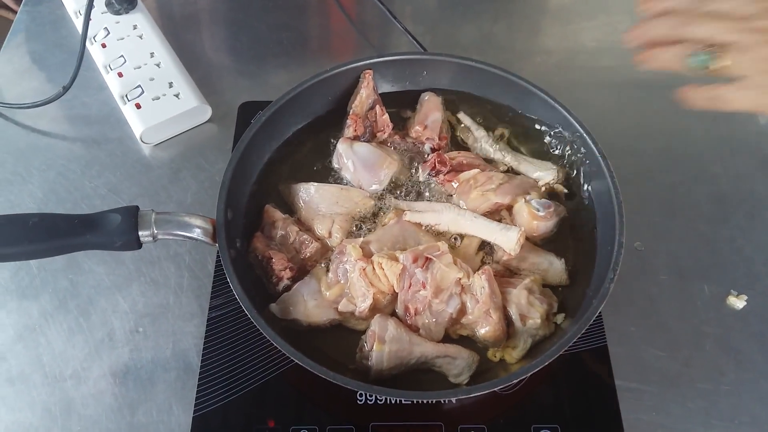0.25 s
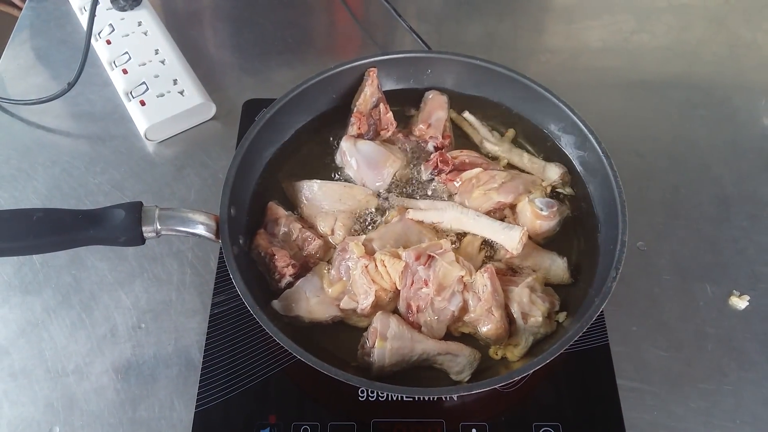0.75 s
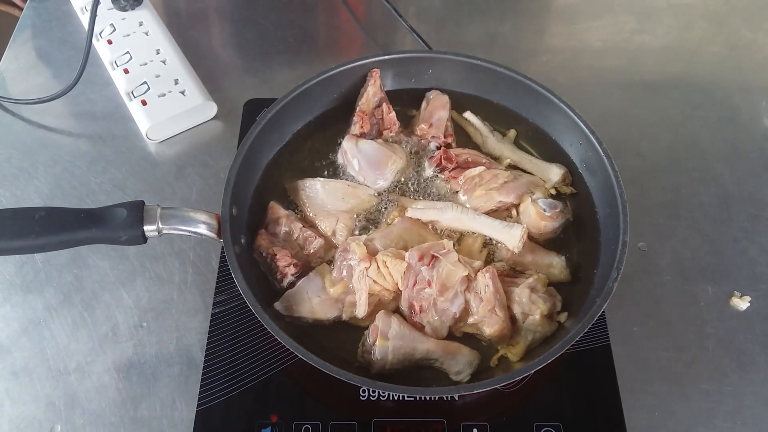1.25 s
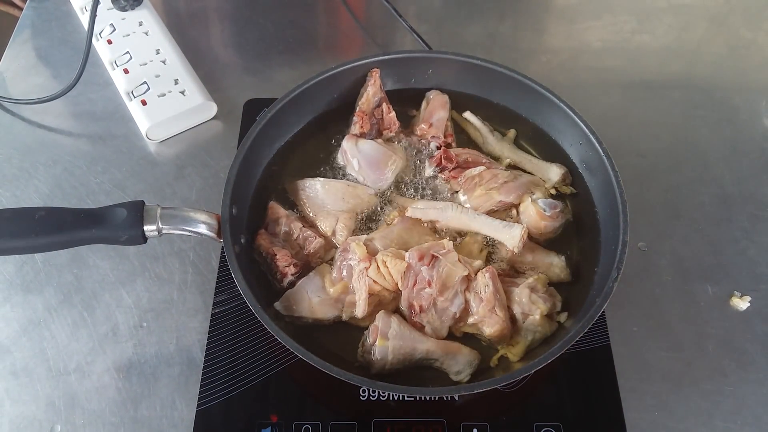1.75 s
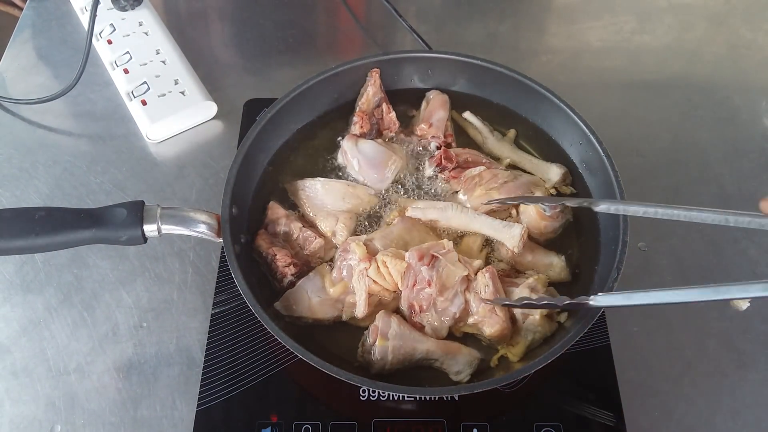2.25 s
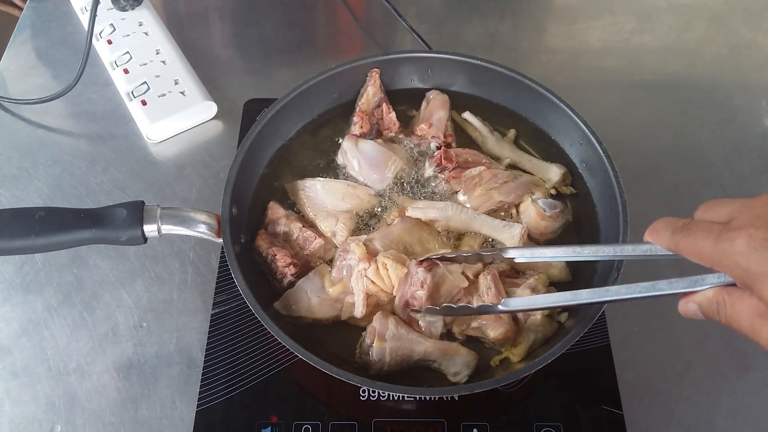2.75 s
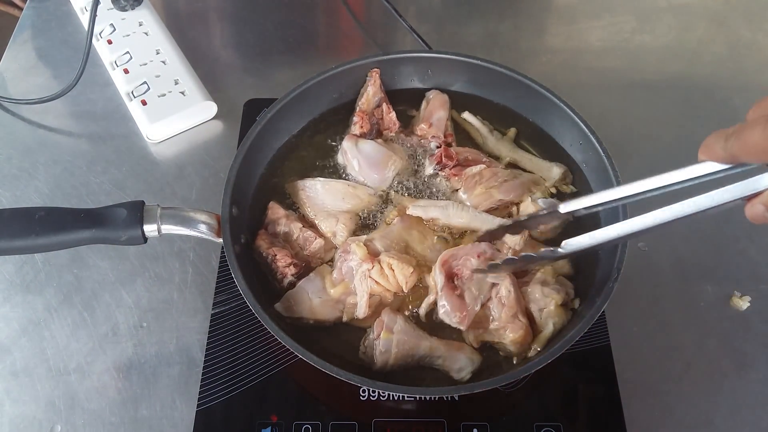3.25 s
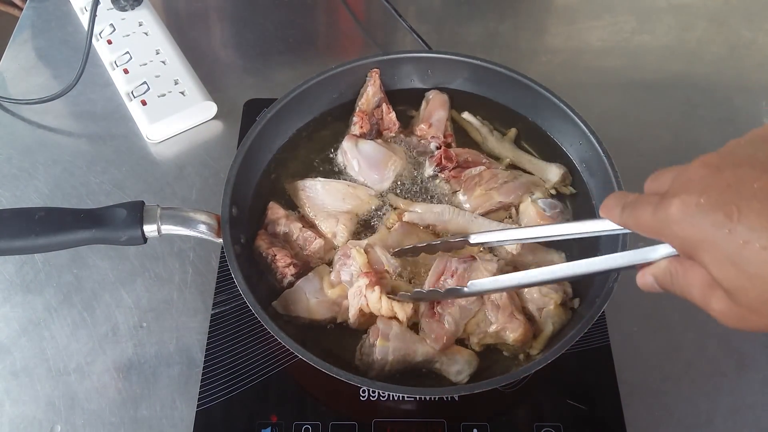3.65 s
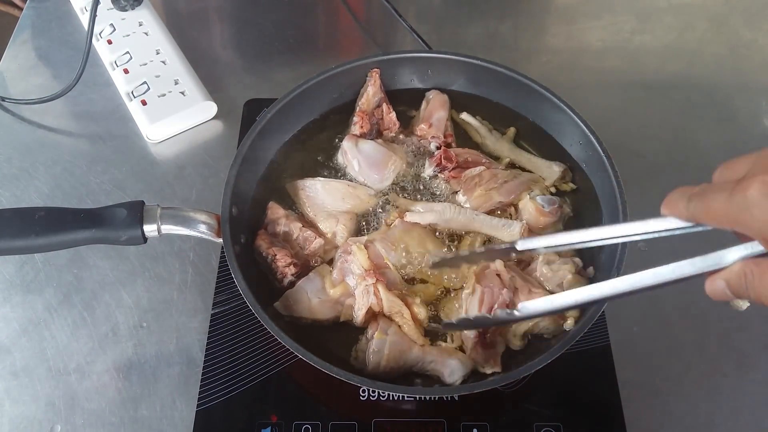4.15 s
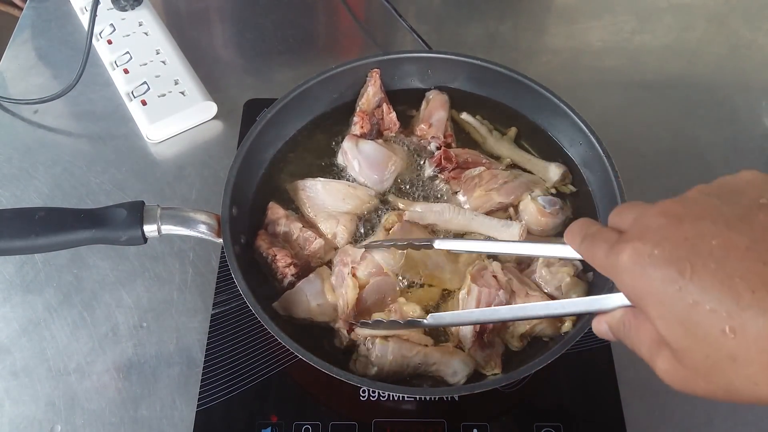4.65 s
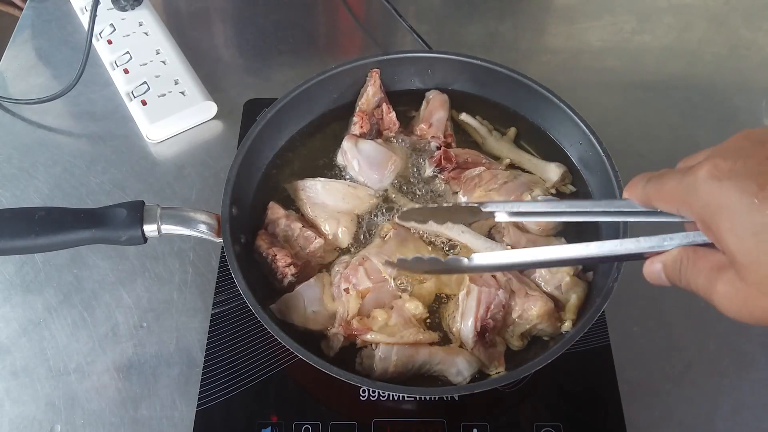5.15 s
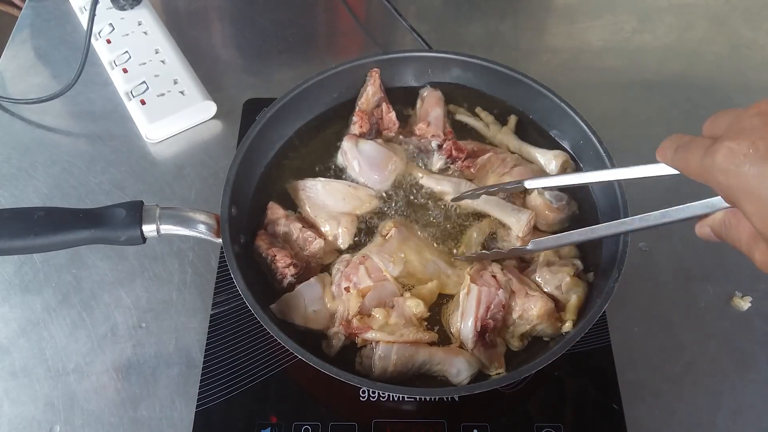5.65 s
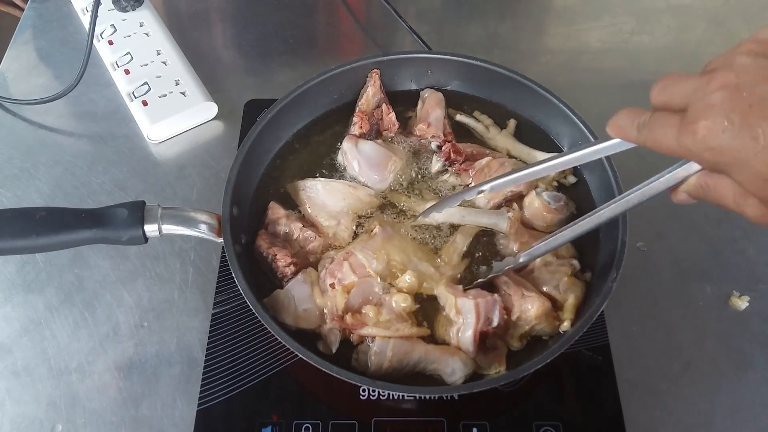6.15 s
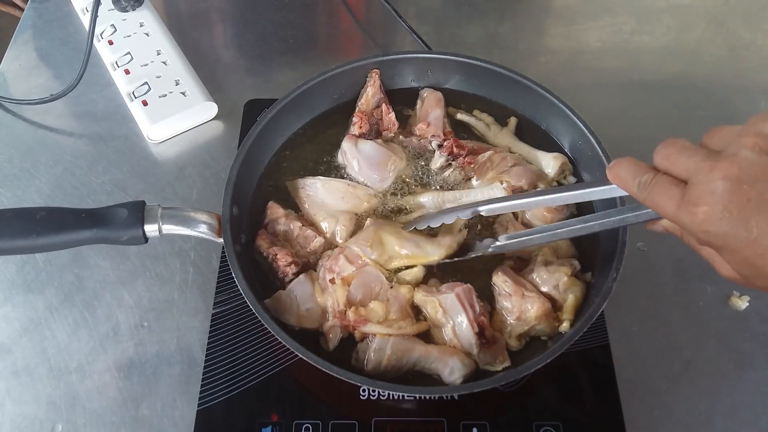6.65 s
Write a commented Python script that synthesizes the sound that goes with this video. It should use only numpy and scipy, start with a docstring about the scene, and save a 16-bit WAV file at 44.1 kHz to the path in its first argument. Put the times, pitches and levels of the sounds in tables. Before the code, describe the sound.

Close to the microphone, raw chicken fries in a pan of oil: fizzing, crackling, gurgling, with sharp pops. Soft dull bumps come first, then the frying eases. Five hard metal clacks from tongs strike one by one, farther off and slightly right, echoing in a bare kitchen. The sizzle revives as pieces are turned, sinks, then flares near the end. Thin steel scrapes and rings after the last two clacks. Low rumble beneath.

```python
"""Chicken sizzles in a pan of hot oil, close by: fizz, crackle and gurgle from random clicks over hiss,
pops from short decaying sines; one frying level drives it, livelier as tongs turn the pieces.
Soft bumps (filtered noise) come at the start and once late, over a low noise rumble.
Five hard clacks, decaying noise with a short ring, sound from farther off and fill the bare kitchen;
twice thin steel rings on after them, as fluttering modes with a rasp."""
import sys
import numpy as np
from scipy.fft import rfft, irfft, next_fast_len
from scipy.io import wavfile
from scipy.ndimage import uniform_filter1d, minimum_filter1d, map_coordinates

SR = 44100
rng = np.random.default_rng(int(sys.argv[2]) if len(sys.argv) > 2 else 0)


def master_out(mix):
    """Clip the mix to full scale and print it as 16-bit PCM to the path in sys.argv[1]."""
    frames = np.transpose(np.atleast_2d(mix))
    ceiling = np.clip(frames, -1, 1)
    pcm = np.round(ceiling * 32767).astype(np.int16)
    wavfile.write(sys.argv[1], SR, pcm)


N = 304290


def amp(db):
    """Decibels to gain."""
    return 10 ** (np.asarray(db) / 20)


def unit(x):
    """Scale to rms 1."""
    return x / np.sqrt(np.mean(x ** 2) + 1e-20)


def seconds(length_s):
    """Sample times of a sound, from 0."""
    return np.arange(int(length_s * SR)) / SR


def noise(n):
    """Two unrelated channels of white noise."""
    return rng.standard_normal((2, n))


def along(points, hz):
    """(f/Hz, value) points read on a log frequency axis."""
    f, value = np.transpose(points)
    return np.interp(np.log(hz + 1), np.log(f + 1), value)


def wobble(knots_per_s):
    """A smooth random curve through normally distributed knots."""
    knots = rng.standard_normal(int(N * knots_per_s / SR) + 4)
    return map_coordinates(knots, [np.arange(N) * knots_per_s / SR])


def filtered(x, response):
    """Multiply the spectrum of x by a response of frequency."""
    n = x.shape[-1]
    padded = next_fast_len(n + 8192)
    hz = np.fft.rfftfreq(padded, 1 / SR)
    return irfft(rfft(x, padded) * response(hz), padded)[..., :n]


def lifts(modes, hz):
    """Summed lift in dB of resonances; width is full width at half the dB lift."""
    return sum(db / (1 + (2 * (hz - centre) / width) ** 2) for centre, width, db in modes)


# stereo likeness of close sound: f/Hz, left-right correlation
NEAR_LIKENESS = [(100, 0.99), (350, 0.99), (800, 0.85), (1500, 0.56), (1850, 0.44), (2600, 0.51),
                 (3700, 0.21), (4600, 0.22), (6500, 0.024)]
# stereo likeness of room-scattered sound: f/Hz, left-right correlation
FAR_LIKENESS = [(250, 1), (400, 0.98), (600, 0.24), (1000, 0.16), (1500, 0.42), (2400, 0.13), (3500, 0.15),
                (6000, .05)]


def spread(pair, colour_db, likeness):
    """Two unrelated signals, coloured and mixed as mid and side to a set correlation, overall rms 1."""
    def mid_side(hz):
        angle = np.arccos(np.clip(along(likeness, hz), -1, 1)) / 2
        return amp(colour_db(hz)) * np.array([np.cos(angle), np.sin(angle)])

    mid, side = filtered(pair, mid_side)
    return unit(np.array([mid + side, mid - side]))


def add(track, s, sound):
    """Mix a sound into a track at time s."""
    i = max(round(s * SR), 0)
    track[:, i:i + sound.shape[-1]] += sound[..., :N - i]


def bursts(rate_per_s, size_db, hiss_rms):
    """Tiny bubbles burst at random, most weak and a few strong (rms 1), over a smooth hiss."""
    hit = rng.random((2, N)) < rate_per_s / SR
    size = np.minimum(rng.exponential(size=(2, N)), 4)
    sign = rng.choice([-1, 1], (2, N))
    return unit(hit * sign * amp(size_db * size)) + hiss_rms * noise(N)


# how hard the oil fries: t/s, level/dB
FRYING = [(0, -41.5), (.45, -40), (.95, -41), (.98, -46.5), (1.25, -49), (1.9, -47), (2.3, -41.5),
          (2.85, -41.5), (4.02, -41), (4.55, -48.5), (4.86, -48.5), (5.4, -54), (6.08, -54.5), (6.3, -43.5),
          (6.55, -45.5), (6.9, -49)]


def frying_level():
    """Frying level in dB per sample; it drives the sizzle, the stray pops and the rumble."""
    s, db = np.transpose(FRYING)
    return np.interp(np.arange(N) / SR, s, db)


# rumble spectrum: f/Hz, relative level/dB per Hz
RUMBLE_COLOUR = [(25, -35), (45, -16), (65, 0.5), (85, 9), (130, -2), (200, -3.5), (400, -26), (900, -60)]
# rumble stereo: f/Hz, left-right correlation
RUMBLE_LIKENESS = [(40, 0.4), (80, 1), (150, 0.93)]


def rumble(frying_db, boil_db=-14, floor_db=-62.5):
    """Low noise: the boil's share follows the frying level, the kitchen's share is steady."""
    level = np.hypot(amp(frying_db + boil_db), amp(floor_db))
    sound = spread(noise(N), lambda hz: along(RUMBLE_COLOUR, hz), RUMBLE_LIKENESS)
    return level * sound * amp([[-2], [1]])


# soft bumps on the counter: t/s, level/dB
BUMPS = [(0.019, -30.5), (0.13, -25.5), (0.281, -38), (0.364, -32), (0.444, -32), (0.509, -30.5),
         (6.32, -39.5)]


def bumps(centre_hz=95, t60_s=0.13, rise_s=0.0032, lead_s=0.005):
    """Dull thumps: bass noise with a fast rise and exponential decay, stronger on the right."""
    out, t = np.zeros((2, N)), seconds(0.2)
    colour_db = lambda hz: -14 * np.log2((hz + 1) / centre_hz) ** 2
    for s, db in BUMPS:
        thump = spread(noise(len(t)), colour_db, [(100, 0.43)])
        envelope = amp(db - 60 * t / t60_s) * (1 - np.exp(-t / rise_s))
        add(out, s - lead_s, envelope * thump)
    return out * amp([[-6], [3]])


# thin steel, first way of ringing: f/Hz, level/dB
SHORT_RING = [(2977, -50), (3698, -53), (4070, -61), (5028, -46), (5787, -58), (6100, -56.5), (6325, -53),
              (7122, -57), (7311, -62), (8070, -64), (8200, -62), (9125, -74), (9975, -72), (11140, -79),
              (14010, -85)]
# thin steel, second way of ringing: f/Hz, level/dB
LONG_RING = [(1020, -49), (2610, -43), (2868, -49), (3747, -56), (5135, -45), (5170, -42.5), (6627, -53),
             (7030, -50), (7170, -52), (8446, -63), (9109, -69), (10767, -69), (10870, -76), (12904, -72)]
# steel scraped and set ringing; level applies to rasp and modes:
# t/s, level/dB, t60/s, rasp level/dB, rasp f/Hz, rasp width/octaves (to -6 dB), modes
SCRAPES = [(5.135, 8.5, 0.55, -44, 5600, 0.36, SHORT_RING), (6.66, 8, 1, -39.5, 1500, 0.83, LONG_RING)]


def steel(rise_s=0.017, flutter_hz=20, flutter_rms=1.0):
    """A noise rasp, and modes of the steel that flutter in level and phase as they die."""
    out, t = np.zeros((2, N)), seconds(1)
    slow = lambda hz: 1 / (1 + (hz / flutter_hz) ** 2)
    for s, db, t60_s, rasp_db, rasp_hz, octaves, modes in SCRAPES:
        rasp_colour_db = lambda hz: -6 * (np.log2((hz + 1) / rasp_hz) / octaves) ** 2
        sound = amp(rasp_db) * spread(noise(len(t)), rasp_colour_db, FAR_LIKENESS)
        for hz, mode_db in modes:
            in_phase, quadrature = unit(filtered(rng.standard_normal((2, 2, len(t))), slow))
            phase = 2 * np.pi * (hz * t + rng.random((2, 1)))
            mode = (1 + flutter_rms * in_phase) * np.sin(phase)
            mode += flutter_rms * quadrature * np.cos(phase)
            sound += amp(mode_db) * unit(mode)
        add(out, s, amp(db - 60 * t / t60_s) * (1 - np.exp(-t / rise_s)) * sound)
    return out


# hard clacks: t/s, level/dB, low thud lift/dB, knock lift/dB, treble lift/dB, t60/s
CLACKS = [(1.462, -13, -0.5, -4, -5, 0.39), (2.339, -11.5, 1.5, -2.5, 0.5, 0.55),
          (4.041, -9, -8, 4, -2, 0.52), (4.881, -12.5, -11.5, 0, -1.5, 0.49),
          (6.468, -11.5, -4, 2.5, 1.5, 0.54)]
# spectrum shared by the clacks: f/Hz, relative level/dB per Hz
CLACK_COLOUR = [(40, -50), (80, -19), (125, -6.5), (180, -3.5), (300, -2), (600, -0.5), (1000, -2.5),
                (1600, -6), (2600, -7), (4300, -10), (6400, -11), (7500, -25), (10500, -44), (16000, -59)]
# resonances shared by the clacks: f/Hz, width/Hz, lift/dB
CLACK_MODES = [(176, 20, 4), (217, 20, 1.5), (356, 42, 2.5), (445, 69, -5), (520, 31, 2), (558, 30, 6),
               (710, 6, -4), (826, 9.3, 1), (894, 29, 8), (1070, 17, -1), (1080, 36, 2), (1493, 43, 3.5),
               (1740, 23, -1), (2023, 114, 5.5), (2147, 49, 6), (2410, 30, 2.5), (3300, 94, 3),
               (5900, 490, 4.5)]
# ring of the struck thing itself: f/Hz, relative level/dB, t60/s
CLACK_RING = [(2007, -7.5, 0.063), (2134, -7.5, 0.063), (3300, -31, 0.063)]


def clacks(rise_s=0.001, hold_s=0.027, low_hz=400, knock_hz=1100, high_hz=2500,
           bass_lag_s=0.071, left_delay_s=0.000363, clump_db=1.08, ring_db=5.5):
    """Blows from the right: a short hard ring, then dense echoes that hold briefly and decay in clumps."""
    out, t = np.zeros((2, N)), seconds(1)
    onset = 1 - np.exp(-t / rise_s)
    for s, db, thud_db, knock_db, treble_db, t60_s in CLACKS:
        colour_db = lambda hz: (along(CLACK_COLOUR, hz) + lifts(CLACK_MODES, hz)
                                + thud_db / (1 + (hz / low_hz) ** 2)
                                + lifts([(knock_hz, 800, knock_db)], hz)
                                + treble_db * hz ** 2 / (hz ** 2 + high_hz ** 2))
        echoes = spread(noise(len(t)), colour_db, FAR_LIKENESS)
        # the room's low modes build up slowly
        bass = filtered(echoes, lambda hz: 1 / (1 + (hz / 230) ** 4))
        body = (echoes - bass) * onset + bass * (1 - np.exp(-t / bass_lag_s))
        decay = amp(-60 * np.maximum(t - hold_s, 0) / t60_s)
        ring = np.zeros((2, len(t)))
        for hz, mode_db, ring_t60_s in CLACK_RING:
            phase = rng.normal(0, 1, (2, 1))
            ring += amp(mode_db + ring_db - 60 * t / ring_t60_s) * np.sin(2 * np.pi * hz * t + phase)
        add(out, s, amp(db) * (decay * body + onset * ring))
    out *= amp(clump_db * wobble(110))
    shift_s = left_delay_s * np.array([[-.5], [.5]])  # left late, right early
    return filtered(out, lambda hz: np.exp(2j * np.pi * hz * shift_s)) * amp([[-.6], [.6]])


# spitting spectrum: f/Hz, relative level/dB per Hz
SPIT_COLOUR = [(1500, -18), (2600, -19), (3500, 0.5), (5200, -10), (6400, 8), (7300, -10), (9000, -22),
               (14000, -34), (16000, -36)]
# wet meat meets the oil: t/s, level/dB, length/s
SPITS = [(0.0, -49.5, 0.79), (0.26, -44, 0.25), (2.087, -51.5, 0.21), (3.277, -43.5, 0.185)]


def spitting(attack_s=0.016, release_t60_s=0.087):
    """Water flashes to steam in sparse sharp ticks: each fit swells, holds and dies away fast."""
    clicks = bursts(rate_per_s=1100, size_db=4.5, hiss_rms=0.43)
    ticks = spread(clicks, lambda hz: along(SPIT_COLOUR, hz), NEAR_LIKENESS)
    t, level = np.arange(N) / SR, np.zeros(N)
    for s, db, length_s in SPITS:
        swell = 1 - np.exp(-np.maximum(t - s, 0) / attack_s)
        level += swell * amp(db - 60 * np.maximum(t - s - length_s, 0) / release_t60_s)
    return level * ticks


def stray_pops(frying_db, count=30, over_frying_db=14, scatter_db=2, typical_hz=1350, scatter_octaves=0.55):
    """Lesser pops at random times, as strong as the oil is lively: rows like those of POPS."""
    at = rng.integers(N, size=count)
    size, pitch = rng.standard_normal((2, count))
    db = frying_db[at] + over_frying_db + scatter_db * size
    hz = typical_hz * 2 ** (scatter_octaves * pitch)
    return np.column_stack([at / SR, db, hz, rng.uniform(-16, -4, count)])


# largest bubbles bursting: t/s, level/dB, f/Hz, relative level of the pan's knock/dB
POPS = [(0.04, -20, 2450, -15), (0.078, -24.5, 1570, -13), (0.102, -31, 1290, -17), (0.176, -23, 5990, -15),
        (0.236, -21, 1650, -5), (0.302, -18, 6150, -10), (0.456, -18.5, 1380, -18), (0.534, -23, 1010, -12),
        (0.648, -25, 1840, -17), (0.709, -22.5, 1890, -11), (0.806, -23, 1560, -19),
        (1.104, -26.5, 1100, -6), (1.74, -20, 5800, -24), (2.014, -22, 1590, -21),
        (2.909, -21.5, 1450, -20), (3.44, -27.5, 1760, -16), (3.773, -23, 1070, -16),
        (3.921, -20, 1310, -20), (5.59, -37.5, 1360, -16), (5.798, -32.5, 1570, -22)]


def pops(rows, cycles=3.7, tear_s=0.002, splash_db=-23, splash_t60_s=0.085,
         pan_hz=797, pan_t60_s=0.035, pan_db=-3):
    """A big bubble rings for a few cycles; the pan answers with a knock and scatters the snap."""
    out, t = np.zeros((2, N)), seconds(0.1)
    for s, db, hz, knock_db in rows:
        phase = rng.normal(0, 0.3, (2, 1))
        envelope = (1 - np.exp(-t * hz * 2)) * np.exp(-2 * t * hz / cycles)
        snap = np.sin(2 * np.pi * hz * t + phase) * envelope
        knock_hz = pan_hz * 2 ** rng.normal(0, 0.08)
        knock = amp(pan_db + knock_db - 60 * t / pan_t60_s) * np.sin(2 * np.pi * knock_hz * t)
        colour_db = lambda f: -10 * np.log10(1 + ((f + 1) / hz - hz / (f + 1)) ** 2)
        # the film tears: a brief noise centred slightly below the bubble's pitch
        film = spread(noise(len(t)), lambda f: colour_db(f / 0.96), NEAR_LIKENESS)
        crack = 0.38 * film * np.exp(-t / tear_s)
        scatter = spread(noise(len(t)), colour_db, FAR_LIKENESS)
        splash = scatter * amp(splash_db - 60 * t / splash_t60_s)
        add(out, s, amp(db) * np.sqrt(2) * (snap + knock + crack + splash))
    return filtered(out, lambda hz: 1 / (1 + (hz / 7200) ** 8))


def bubbles(count=1300, centre_hz=1700, cycles=3.5, size_db=2.5):
    """Middle-sized bubbles, each a dry snap of its own pitch within an octave of the centre."""
    out, t = np.zeros((2, N)), seconds(0.02)
    for when, pitch, size, side in rng.random((count, 4)):
        hz = centre_hz * 2 ** (2 * (pitch - .5))
        phase = np.array([[1], [-1]]) * (side - .5) * 2  # opposite in left and right
        snap = np.sin(2 * np.pi * hz * t + phase) * np.exp(-2 * t * hz / cycles)
        level = amp(-size_db * np.log(size + 0.026))  # few are strong
        add(out, when * N / SR, level * (1 - np.exp(-t * hz)) * snap)
    return unit(filtered(out, lambda hz: 1 / (1 + (hz / 6500) ** 10)))


# gurgle spectrum: f/Hz, relative level/dB per Hz
BUBBLING_COLOUR = [(76, -27), (130, -13), (194, -8), (237, -12), (290, 1), (371, 0.5), (410, -8),
                   (469, -5.5), (506, -8.5), (700, -12.5), (910, -67), (1540, -120)]


def bubbling(level_db=0.65, drift_db=0.96):
    """Steam gurgles under the meat: low-coloured bursts that drift in level."""
    clicks = bursts(rate_per_s=700, size_db=2, hiss_rms=0.67)
    gurgle = spread(clicks, lambda hz: along(BUBBLING_COLOUR, hz), NEAR_LIKENESS)
    return amp(level_db + drift_db * wobble(5.05)) * gurgle


# crackle spectrum: f/Hz, relative level/dB per Hz
CRACKLE_COLOUR = [(260, -12), (450, -7), (607, -3), (826, 4.5), (1200, -4), (1270, -4.5), (1590, 2.5),
                  (2100, -2.5), (2810, -3.5), (3270, -4.5), (4500, -12.5), (5850, -23), (9900, -120)]
# resonances of the pan: f/Hz, width/Hz, lift/dB
PAN_MODES = [(1311, 20, 16.5), (775, 45, -2), (680, 44, 4.5)]


def crackle(spurts, level_db=-0.04, flare_db=2.5):
    """Steam crackles at the meat's edges: bursts coloured by the pan's resonances, in spurts."""
    clicks = bursts(rate_per_s=900, size_db=1.5, hiss_rms=0.74)
    colour_db = lambda hz: along(CRACKLE_COLOUR, hz) + lifts(PAN_MODES, hz)
    return amp(level_db + flare_db * spurts) * spread(clicks, colour_db, NEAR_LIKENESS)


# fizz spectrum: f/Hz, relative level/dB per Hz
FIZZ_COLOUR = [(2500, -28), (3800, -9.5), (5000, 0), (6100, 2.5), (6700, -4), (7400, -13), (8500, -21.5),
               (10500, -32.5), (13000, -37.5), (16000, -36)]


def fizz(spurts, level_db=0.46, flare_db=0.83):
    """Steam fizzes on the oil: dense treble bursts, with the spurts and a flutter of their own."""
    clicks = bursts(rate_per_s=2200, size_db=4.0, hiss_rms=0.8)
    hissing = spread(clicks, lambda hz: along(FIZZ_COLOUR, hz), NEAR_LIKENESS)
    return amp(level_db + flare_db * (spurts + wobble(19))) * hissing


def sizzle(frying_db, bubbles_db=-5):
    """Four layers of steam and bubbles follow the frying level; crackle and fizz spurt together."""
    spurts = wobble(36)
    layers = bubbling() + crackle(spurts) + amp(bubbles_db) * bubbles() + fizz(spurts)
    return amp(frying_db) * layers


def scene():
    """The pan is near and slightly to the right."""
    frying_db = frying_level()
    background = rumble(frying_db) + bumps() + steel() + clacks()
    oil = spitting() + pops(stray_pops(frying_db)) + pops(POPS) + sizzle(frying_db)
    return background + oil * amp([[-.8], [.8]])


def record(dry, bass_hz=36, ceiling=.85, top_hz=15830):
    """The microphone thins the deepest bass, a limiter holds the peaks, a sharp cut ends the treble."""
    x = filtered(dry, lambda hz: hz ** 4 / (hz ** 4 + bass_hz ** 4))
    needed = np.minimum(1, ceiling / (np.abs(x).max(axis=0) + 1e-9))
    gain = uniform_filter1d(minimum_filter1d(needed, size=260), size=130)
    return filtered(x * gain, lambda hz: hz < top_hz)


dry = scene()
out = record(dry)
master_out(out)
```